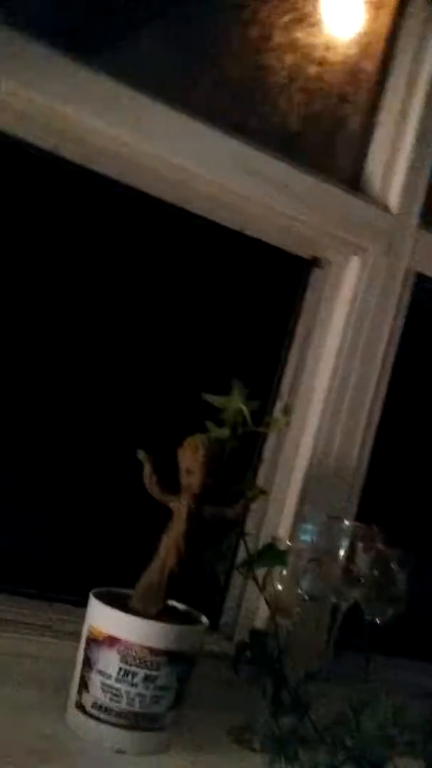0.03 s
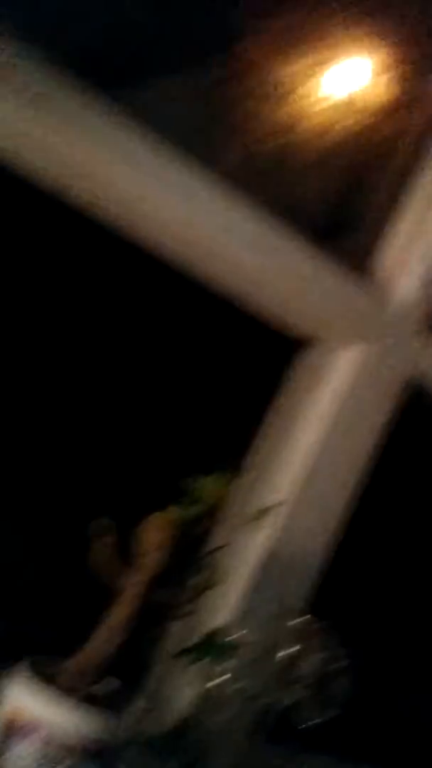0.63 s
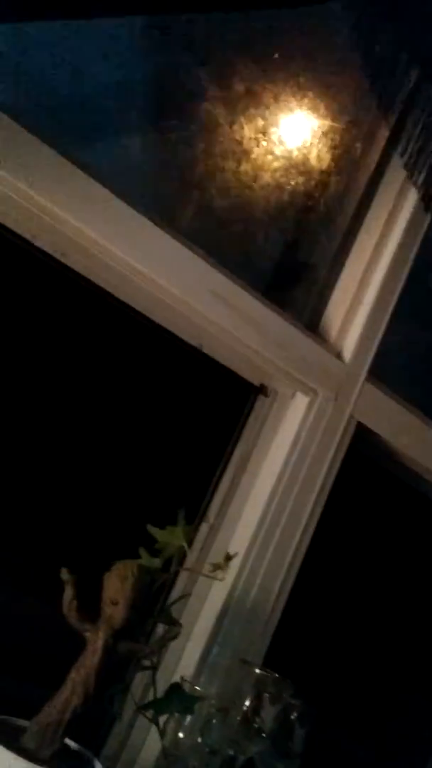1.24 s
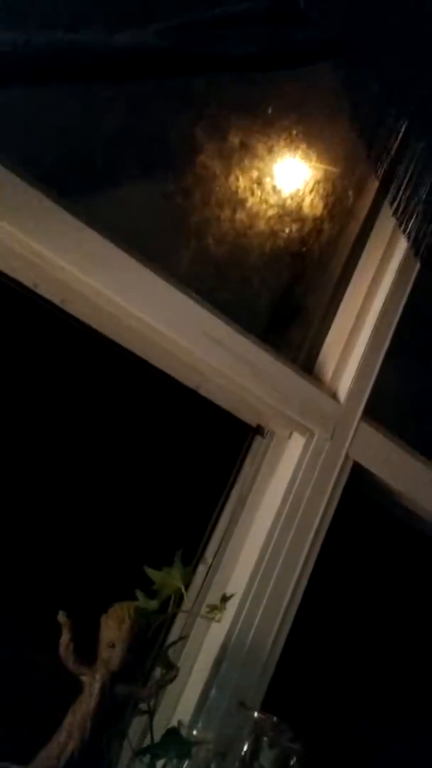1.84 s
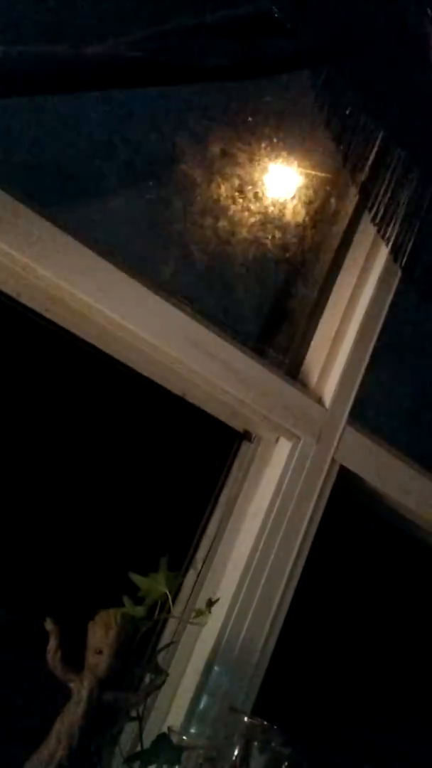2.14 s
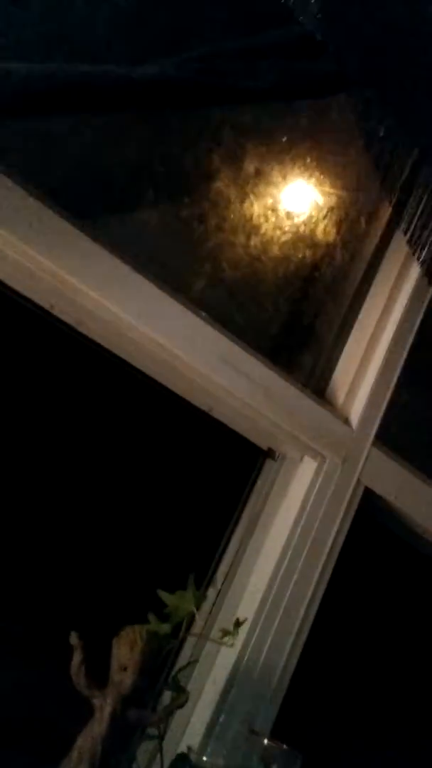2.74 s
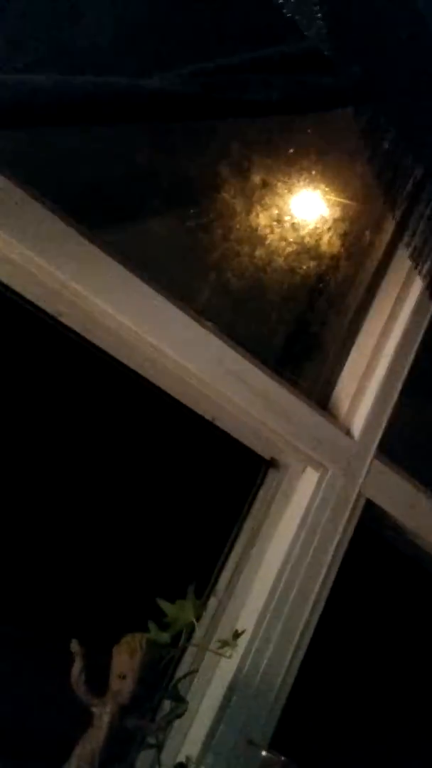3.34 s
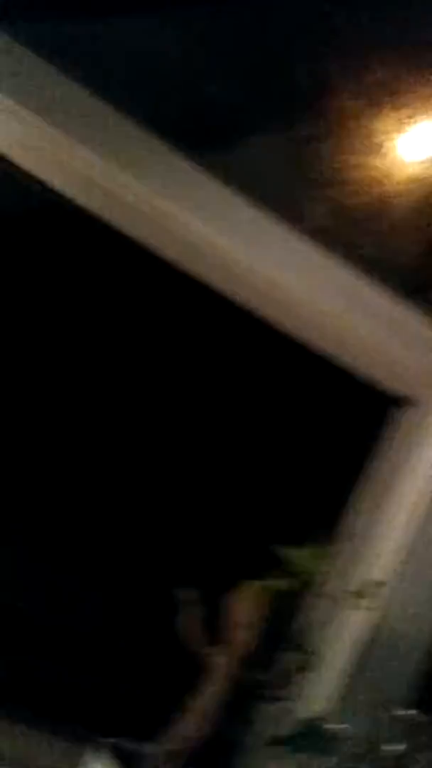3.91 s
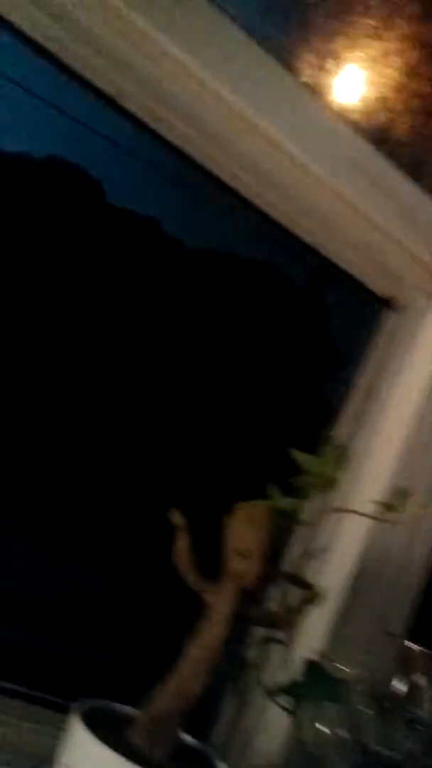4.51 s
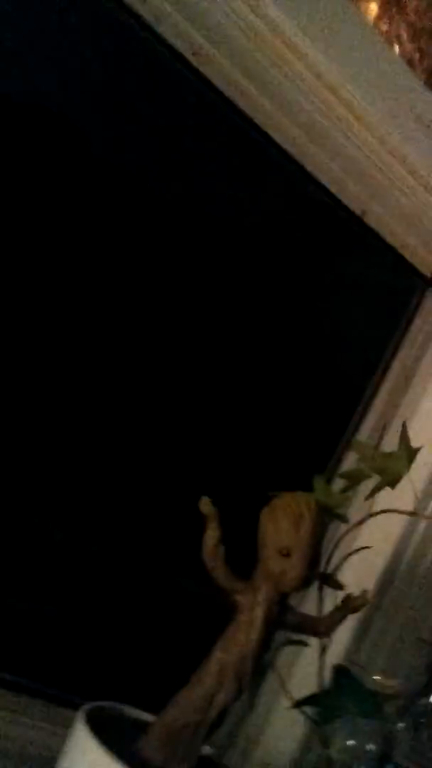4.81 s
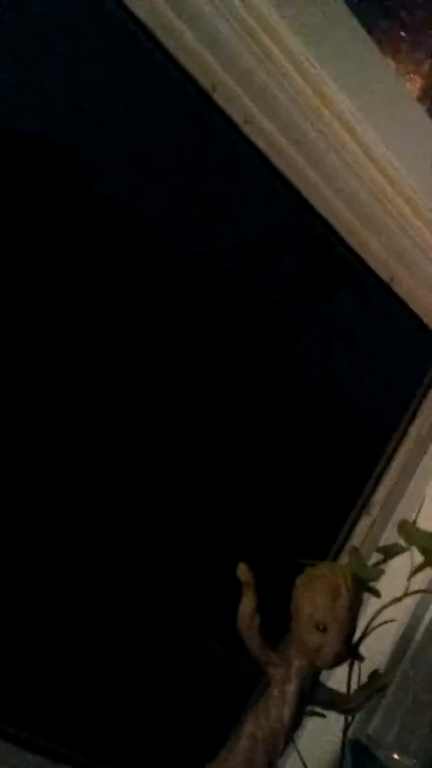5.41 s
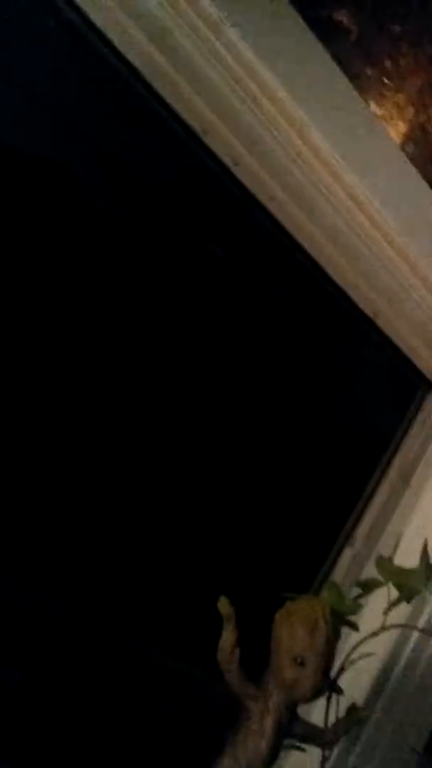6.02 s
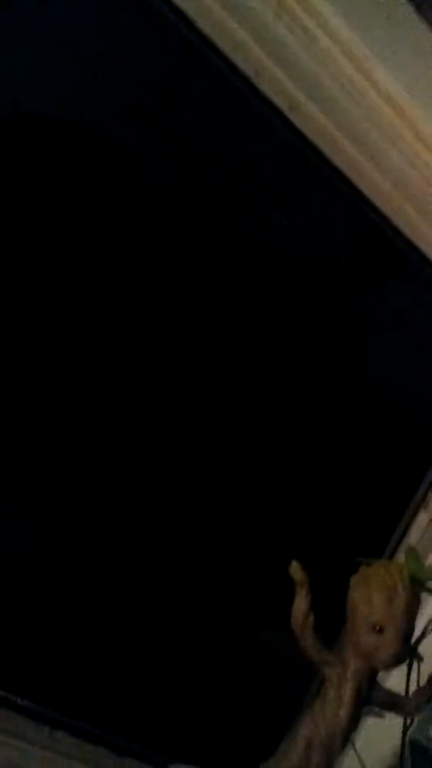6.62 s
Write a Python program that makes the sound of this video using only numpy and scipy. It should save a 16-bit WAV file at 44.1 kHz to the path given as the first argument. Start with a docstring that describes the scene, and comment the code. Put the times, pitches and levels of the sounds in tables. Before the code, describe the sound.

Rain patters and drips against a window at night, heard from indoors close to the glass. A long, low roll of distant thunder dies down and the wider wash of rain sinks away. A second roll swells unevenly as the rain returns in gusts. A fine high fizz runs underneath, rising twice in a handling swish as the microphone moves along the pane, with a few light taps.

```python
"""Night rain heard from indoors, close to a window: near drops patter, drip and ring the pane.
Behind them a broad wash of far drops sinks away for three seconds and returns in gusts.
Under the rain one long roll of distant thunder dies down and a second follows, both swelling unevenly.
The sound fades in over faint hiss after half a second of silence. A steady high fizz, like fine spray,
swells twice with a handling swish as the microphone moves along the glass, and there are a few taps."""
import sys
import numpy as np
from scipy import signal
from scipy.fft import rfft, irfft
from scipy.io import wavfile

SR = 44100
rng = np.random.default_rng(int(sys.argv[2]) if len(sys.argv) > 2 else 0)


def store_wav(level_fs):
    """Save 16-bit WAV to argv[1]."""
    pcm = np.round(np.clip(np.atleast_2d(level_fs), -1, 1) * 32767)
    wavfile.write(sys.argv[1], SR, pcm.T.astype(np.int16))


N = 293706
T = np.arange(N) / SR
HZ = np.fft.rfftfreq(N, 1 / SR)

# envelope of the rain close to the window: (time [s], level [dB])
NEAR_LEVEL = [(2.4, -59), (2.7, -62.5), (4.3, -62), (4.85, -59.5), (5.2, -62), (5.88, -53), (6.2, -54.5),
              (6.5, -56.5)]
# microphone's path along the glass: (time [s], place [0 = first, 1 = second])
MIC_PLACE = [(2.4, 0.055), (2.65, .55), (2.82, .03), (3.03, .5), (3.3, 0.073), (3.6, 0.3), (4.3, 0.9),
             (4.85, 0.91), (5.55, 0.75), (6.6, 0.84)]
# EQ of the near rain through the glass at each place: (frequency [Hz], gain [dB])
FIRST_PLACE_EQ = [(150, -12), (350, 6.5), (500, -4), (680, 1), (930, -0.5), (1130, -3), (1600, -1.5),
                  (2300, -12), (2900, -13.5), (3400, -21.5), (5000, -17), (7000, -38), (12000, -43)]
SECOND_PLACE_EQ = [(150, -12), (350, -1), (540, -2.5), (700, 1.5), (920, 3), (1130, -5.5), (1300, -12),
                   (1700, -4.5), (2200, -10), (2750, -13), (3300, -25.5), (5000, -19.5), (6500, -16),
                   (12000, -30)]
# window resonances: (centre [Hz], width [Hz], gain at first place [dB], gain at second place [dB])
PANE_RESONANCES = [(542, 26, 2, 5), (730, 26, 12.5, 2.5), (1035, 70, 8, -2), (1228, 20, 9, 8),
                   (1436, 64, -10.5, -4.5), (1484, 52, 12, 3.5), (1530, 20, 2, 8.5), (1614, 12, 8.5, 6),
                   (1745, 77, -2, 9), (1870, 205, 0, -13), (1910, 76, 1, -4.5), (2060, 30, -10, 1),
                   (2250, 98, 5, 0), (2227, 24, 2, -16), (2277, 31, -11, 6), (2470, 55, 12, -10),
                   (2525, 69, -2.5, -10), (3690, 320, 4, 5.5), (4230, 180, 2, -2)]
# early reflections off the frame and sill: (delay [s], gain [linear])
REFLECTIONS = [(.0061, 0.12), (0.0109, 0.3)]
# ringing window modes: (pitch [Hz], half-width [Hz], level against near rain [dB], loudest place [0-1])
RING_MODES = [(1364.5, 19, -5.5, 0.14), (1974, 33, -11, 0.85)]
# a few clearer drips: (time [s], level [dB], pitch [Hz])
PLINKS = [(4.514, -59, 1980), (4.715, -53, 1705), (4.824, -53.5, 1735), (5.045, -60, 1600)]
# envelope of the far rain: (time [s], level [dB])
WASH_LEVEL = [(2.43, -54), (2.59, -70), (3.5, -68.5), (5.3, -63.5), (6.2, -57.7), (6.58, -53.5)]
# EQ of the far rain: (frequency [Hz], gain [dB])
WASH_EQ = [(110, -24), (200, 7.5), (350, 3.5), (480, 2.5), (620, 1), (1050, -1.5), (1600, -4.5), (2300, -7),
           (2800, -11.5), (3400, -13.5), (5500, -15.5), (6800, -18.5), (8000, -33.5), (15000, -43.5)]
# gusts throw more rain at the house: (crest time [s], boost [dB])
GUSTS = [(4.22, 7), (5.45, 7.5)]

# envelope of the two rolls of thunder: (time [s], level [dB])
THUNDER_LEVEL = [(.7, -52.5), (1.05, -51), (1.4, -50.5), (1.95, -54), (2.4, -55.5), (2.6, -61.5),
                 (3.2, -66), (3.45, -61.5), (4.03, -59.5), (4.3, -53.5), (4.7, -51.5), (5.05, -55),
                 (5.65, -51.5), (6.6, -53.5)]
# brief, irregular swells in the rumble's loudness: (crest time [s], boost [dB])
ROLL_SURGES = [(.99, 5.5), (1.26, -0.5), (1.46, 2), (1.72, 7), (2.17, 9), (2.87, 5), (3.41, 10), (3.6, 8.5),
               (3.79, 10.5), (4.8, 7.5), (5.22, 5.5), (5.35, 6), (5.59, 6.5), (5.81, 5.5), (6.16, 4)]
# length of the thunder's path: (time [s], distance [0 = nearer and brighter, 1 = further and duller])
THUNDER_DISTANCE = [(2.6, 0.053), (3.5, 0.68), (4.1, 0.06), (4.35, 0.09), (4.65, 0.85), (6.6, 0.99)]
# envelope of the sub boom, which swells at its own pace: (time [s], level [dB])
BOOM_LEVEL = [(.75, -69), (.98, -61), (2.3, -69), (3.05, -80), (3.4, -67), (3.9, -59.5), (4.5, -67),
              (5.2, -63), (6.6, -62)]
# EQ of the thunder's layers, from sub to low mids: (frequency [Hz], gain [dB])
BOOM_EQ = [(15, -36), (30, -10), (42, -17), (53, 11), (62, 10), (75, -7), (150, -51)]
ROLL_EQ = [(20, -53), (45, -28), (64, -7), (84, -0.5), (133, -1), (160, -5), (200, -19.5), (400, -53)]
NEAR_GROWL_EQ = [(110, -26.5), (170, 3.5), (205, -0.5), (250, -7.5), (300, -3.5), (345, -4), (420, -5.5),
                 (490, -8.5), (800, -38.5)]
FAR_GROWL_EQ = [(110, -23), (170, 0), (215, -5), (260, 1), (305, -4.5), (350, -6), (420, -11), (490, -15.5),
                (800, -41)]
# thumps within the thunder: (time [s], level [dB], centre [Hz], 60 dB decay [s])
THUMPS = [(.97, -43, 190, .15), (1.052, -53, 212, .08), (1.325, -42, 200, .16), (4.16, -46, 190, 0.16),
          (4.252, -49.5, 226, .09), (4.32, -46, 294, .2), (4.44, -43.5, 269, 0.2), (4.87, -43, 242, 0.13)]
# low resonances of the room: (centre [Hz], width [Hz], gain [dB])
ROOM_MODES = [(91, 27, 4), (131.5, 17.6, 6.5), (209.7, 24.4, 6.5), (265.6, 33, 4.5), (310.6, 25, 6),
              (359.5, 20, 3), (426.6, 43, 6)]

# EQ of the high fizz: (frequency [Hz], gain [dB])
FIZZ_EQ = [(1500, -13), (2700, -2.5), (3700, -13.5), (5200, -16.5), (7500, 3.5), (9300, 5.5), (10500, 1),
           (12500, -4), (16000, -30.5)]
# handling swishes that swell the fizz: (crest time [s], boost [dB])
SWISHES = [(4.16, 6), (6.6, 4.5)]
# light taps: (time [s], level [dB], centre [Hz], 60 dB decay [s])
TAPS = [(4.122, -60, 1700, 0.093), (4.203, -50.5, 2150, 0.043), (4.232, -62, 2200, 0.16),
        (5.832, -46.5, 1270, 0.065), (5.886, -50, 970, 0.1), (6.589, -54, 1100, 0.056)]
# EQ of the microphone hiss: (frequency [Hz], gain [dB])
HISS_EQ = [(20, 8), (1000, -13), (3500, -25), (5400, -10), (6500, 0.5), (7500, 0.5), (10000, -1),
           (11500, -.5), (15700, 3)]
# peaks and a notch of the microphone port: (centre [Hz], width [Hz], gain [dB])
PORT_RESONANCES = [(7450, 580, 5), (7960, 240, 2.5), (8490, 580, -6.5), (9150, 410, 4)]


def near_rain(flutter_db=1.0, drips_db=-6.5):
    """Patter and drips pass the window, whose resonances crossfade as the microphone moves along it."""
    place = curve(MIC_PLACE)
    first = eq(FIRST_PLACE_EQ) + sum(db * bell(hz, width) for hz, width, db, _ in PANE_RESONANCES)
    second = eq(SECOND_PLACE_EQ) + sum(db * bell(hz, width) for hz, width, _, db in PANE_RESONANCES)
    out = np.zeros(N)
    for share, colour in (1 - place, first), (place, second):
        drops = coloured(patter(per_s=700, spread_db=3.0, wash_db=-1.5), colour)
        bubbles = gain_of(drips_db) * coloured(drips(), colour)
        out += np.sqrt(share) * unit_rms(drops + bubbles)
    out = burbling(reflected(out))
    return out * gain_of(curve(NEAR_LEVEL) + flutter_db * drift(rate_hz=30))


def patter(per_s, spread_db, wash_db):
    """Drops of uneven size click over a noise bed of blended far ones."""
    size = gain_of(spread_db * np.minimum(rng.exponential(1, N), 4))
    drops = size * rng.choice([-1, 1], N) * (rng.random(N) < per_s / SR)
    return unit_rms(drops) + gain_of(wash_db) * rng.standard_normal(N)


def drips(per_s=170, spread_db=2, low_hz=900, high_hz=3300, decay_cycles=22, glide=0.0408, voices=36):
    """Drops falling into water ring small bubbles, each bending up a little in pitch."""
    t, out = np.arange(SR // 10) / SR, np.zeros(N)
    for hz in np.geomspace(low_hz, high_hz, voices) * rng.uniform(0.98, 1.03, voices):
        age = hz * t / decay_cycles
        phase = 2 * np.pi * hz * t * (1 + glide * np.tanh(age / 2))
        bubble = np.sin(phase) * np.exp(-age) * (1 - np.exp(-hz * t))
        size = gain_of(spread_db * np.minimum(rng.exponential(1, N), 3))
        triggers = rng.random(N) < per_s / voices / SR
        out += signal.oaconvolve(size * triggers, bubble)[:N]
    return unit_rms(out)


def reflected(x, sway_s=0.00021):
    """Reflections lengthen and shorten as the microphone sways, sweeping a gentle comb filter."""
    echoes = sum(gain * np.interp(T - delay_s - sway_s * drift(rate_hz=0.86), T, x)
                 for delay_s, gain in REFLECTIONS)
    return unit_rms(x + echoes)


def burbling(x, depth_db=3.8, patch_hz=140, patch_s=0.12):
    """Water lands in small clusters, each favouring its own pitch for a moment, most in the treble."""
    frames = dict(nperseg=1024, noverlap=768)
    hz, t, spectrogram = signal.stft(x, SR, **frames)
    across = np.fft.fftfreq(len(hz), hz[1])[:, None] * patch_hz
    along = np.fft.fftfreq(len(t), t[1]) * patch_s
    blur = np.exp(-2 * (across ** 2 + along ** 2))
    patches = np.fft.ifft2(np.fft.fft2(rng.standard_normal(spectrogram.shape)) * blur).real
    soft_clipped = 2 * np.tanh(unit_rms(patches) / 2)
    treble_weight = np.interp(hz, [500, 2000], [0.4, 1])[:, None]
    spectrogram *= gain_of(depth_db * treble_weight * soft_clipped)
    return unit_rms(signal.istft(spectrogram, SR, **frames)[1][:N])


def window_ring(falloff_db=16.5):
    """Near drops keep two window modes humming; each is loudest at its own place along the glass."""
    out = np.zeros(N)
    for hz, half_width, db, loudest_at in RING_MODES:
        resonance_db = 20 * np.log10(bell(hz, 2 * half_width) + 1e-4)
        mode = coloured(patter(per_s=300, spread_db=5.5, wash_db=-2.0), resonance_db)
        distance = np.abs(curve(MIC_PLACE) - loudest_at)
        out += mode * gain_of(curve(NEAR_LEVEL) + db - falloff_db * distance)
    return out


def plinks(t60=0.098):
    """Single larger drips ring briefly above the patter."""
    out, t = np.zeros(N), np.arange(SR // 5) / SR
    for s, db, hz in PLINKS:
        envelope = (1 - np.exp(-hz * t / 2)) * gain_of(db - 60 * t / t60)
        out[round(s * SR):][:len(t)] += np.sin(2 * np.pi * hz * t) * envelope
    return out


def rain_wash(flutter_db=0.4):
    """Countless drops further off merge into an even rush that swells with each gust."""
    rush = coloured(patter(per_s=3000, spread_db=0.5, wash_db=4), eq(WASH_EQ))
    gusts_db = swells(GUSTS, rise_s=0.056, fall_s=0.19)
    return rush * gain_of(curve(WASH_LEVEL) + gusts_db + flutter_db * drift(rate_hz=10))


def thunder(growl_db=0.67, growl_surge_share=0.2, distance_loss_db=3):
    """Roll and growl swell unevenly over a sub boom; the air dulls what comes from further away."""
    level_db, far = curve(THUNDER_LEVEL), curve(THUNDER_DISTANCE)
    surges_db = swells(ROLL_SURGES, rise_s=0.02, fall_s=0.068)
    boom = rumble(BOOM_EQ, smooth_s=0.4, compression=0.65) * gain_of(curve(BOOM_LEVEL))
    roll = rumble(ROLL_EQ, smooth_s=0.24, compression=1.0) * gain_of(level_db + surges_db)
    growl = np.sqrt(1 - far) * rumble(NEAR_GROWL_EQ, smooth_s=0.36, compression=1.0)
    growl += np.sqrt(far) * rumble(FAR_GROWL_EQ, smooth_s=0.3, compression=0.49)
    growl *= gain_of(level_db + growl_surge_share * surges_db - distance_loss_db * far + growl_db)
    return boom + roll + growl + knocks(THUMPS, octaves=0.39)


def rumble(spectrum, smooth_s, compression):
    """Countless far echoes merge into a steady low noise, coloured by the room."""
    noise = coloured(rng.standard_normal(N), eq(spectrum) + bells(ROOM_MODES))
    window = signal.windows.hann(int(smooth_s * SR))
    power = signal.fftconvolve(noise ** 2, window / window.sum(), "same")
    return unit_rms(noise / (np.abs(power) + 1e-6) ** (compression / 2))


def knocks(rows, octaves):
    """Each blow is a burst of band-passed noise with a fast decay."""
    out, t = np.zeros(N), np.arange(SR // 4) / SR
    hz = np.fft.rfftfreq(len(t), 1 / SR) + 1
    for s, db, centre_hz, t60 in rows:
        band = 1 / (1 + (np.log2(hz / centre_hz) / octaves) ** 4)
        burst = unit_rms(irfft(rfft(rng.standard_normal(len(t))) * band, len(t)))
        attack = 1 - np.exp(-2 * centre_hz * t)  # low blows start more softly
        slot = out[round(s * SR):][:len(t)]
        slot += (burst * attack * gain_of(db - 60 * t / t60))[:len(slot)]
    return out


def high_fizz(rest_db=-70.0, port_share=0.73):
    """A steady high fizz, like fine spray, swelling twice with a handling swish."""
    fizz = coloured(rng.standard_normal(N), eq(FIZZ_EQ) + port_share * bells(PORT_RESONANCES))
    return fizz * gain_of(rest_db + swells(SWISHES, rise_s=0.23, fall_s=0.42))


def taps():
    """Light taps on the camera and the window."""
    return knocks(TAPS, octaves=0.75)


def mic_hiss(level_db=-65.5):
    """The microphone's noise floor, coloured by its port."""
    return gain_of(level_db) * coloured(rng.standard_normal(N), eq(HISS_EQ) + bells(PORT_RESONANCES))


def gain_of(db):
    """Decibels to amplitude."""
    return 10 ** (np.asarray(db) / 20)


def unit_rms(x):
    """Normalises to rms 1."""
    return x / np.sqrt(np.mean(x ** 2) + 1e-20)


def curve(rows):
    """Automation: straight lines through (time [s], value) breakpoints."""
    return np.interp(T, *np.transpose(rows))


def swells(rows, rise_s, fall_s):
    """Boost in dB over time: each event rises smoothly to its crest and falls away."""
    return sum(db * np.exp(-((T - s) / np.where(T < s, rise_s, fall_s)) ** 2) for s, db in rows)


def drift(rate_hz):
    """Smooth random modulation of rms 1, rolled off above rate_hz."""
    return unit_rms(irfft(rfft(rng.standard_normal(N)) / (1 + (HZ / rate_hz) ** 4), N))


def eq(points):
    """EQ curve in dB, joined on a log-frequency axis."""
    hz, db = np.transpose(points)
    return np.interp(np.log(HZ + 1), np.log(hz), db)


def bell(hz, width):
    """Shape of one resonance, 1 at its centre."""
    return 1 / (1 + (2 * (HZ - hz) / width) ** 2)


def bells(rows):
    """EQ curve in dB of a bank of resonances."""
    return sum(db * bell(hz, width) for hz, width, db in rows)


def coloured(x, db):
    """Minimum-phase EQ, so that each impact rings after it lands; rms 1."""
    cepstrum = irfft(np.log(gain_of(db)), N) * (1 + np.sign(N / 2 - np.arange(N)))
    cepstrum[0] /= 2
    return unit_rms(irfft(rfft(x) * np.exp(rfft(cepstrum)), N))


def scene():
    """Rain, thunder, fizz and taps reach one microphone that feeds both channels."""
    rain = rain_wash() + near_rain() + window_ring() + plinks()
    mono = rain + thunder() + high_fizz() + taps()
    return np.array([mono, mono])


def record(dry, start_s=0.568, fade_s=0.23, high_cut_hz=15760):
    """Adds the hiss, fades in from silence and cuts off the top end."""
    ramp = np.clip((T - start_s) / fade_s, 0, 1)
    fade_in = (T > start_s) * (0.08 + 0.91 * ramp)
    high_cut = signal.firwin(801, high_cut_hz, window=("kaiser", 9), fs=SR)
    return signal.oaconvolve((dry + mic_hiss()) * fade_in, high_cut[None], "same")


dry = scene()
out = record(dry)
store_wav(out)
```